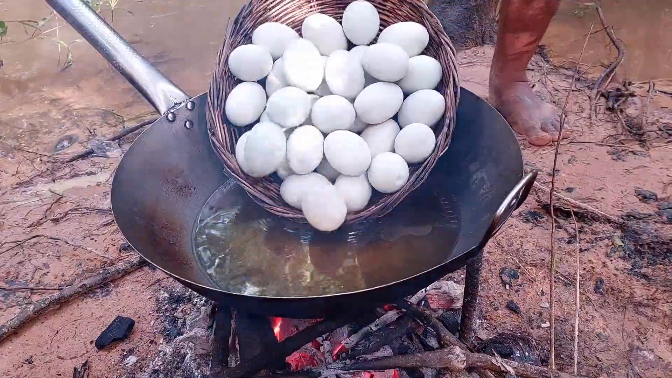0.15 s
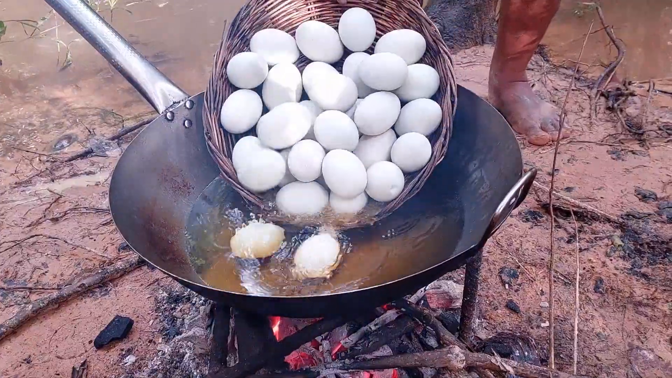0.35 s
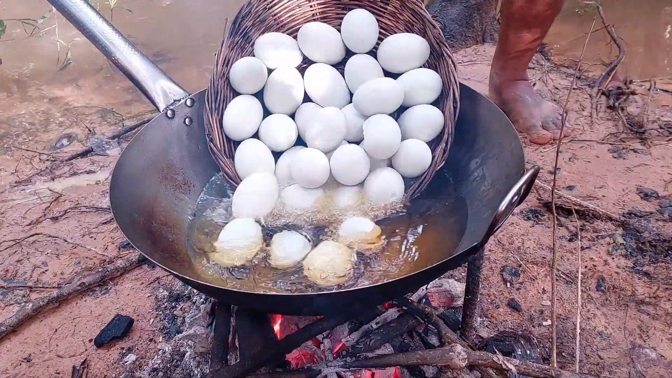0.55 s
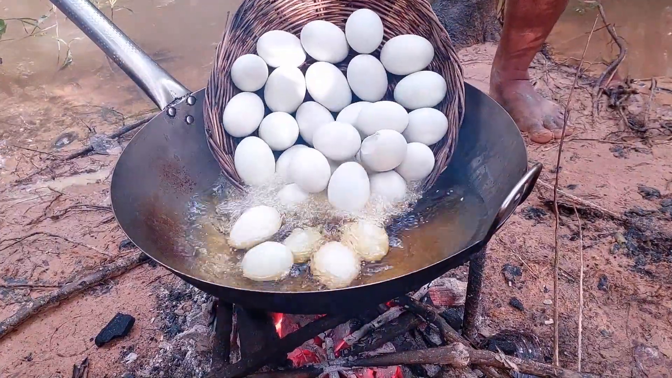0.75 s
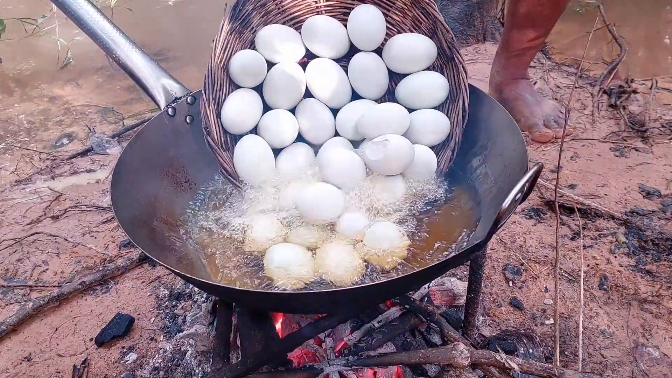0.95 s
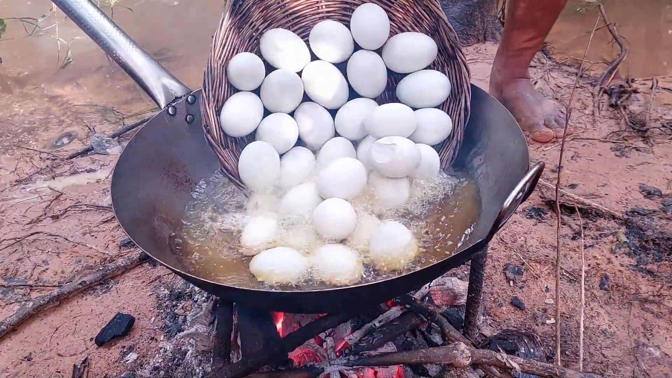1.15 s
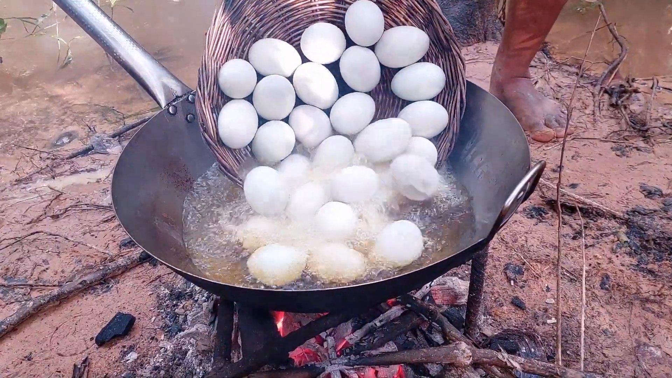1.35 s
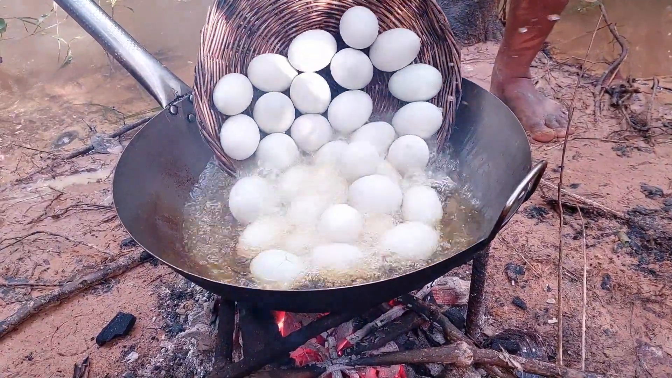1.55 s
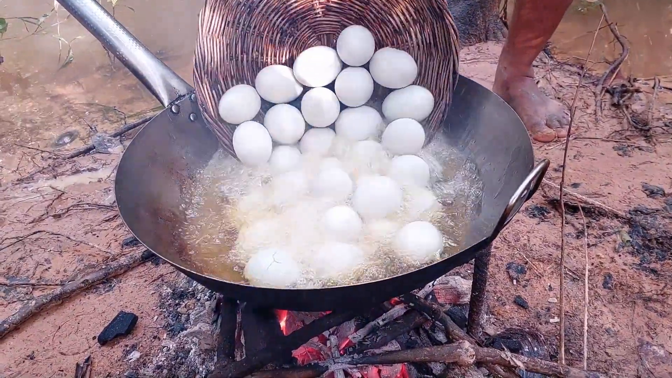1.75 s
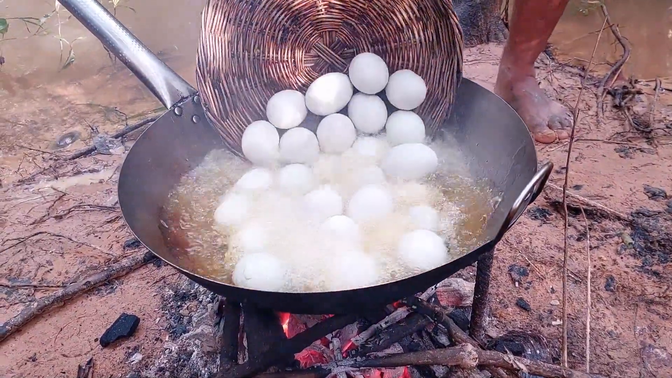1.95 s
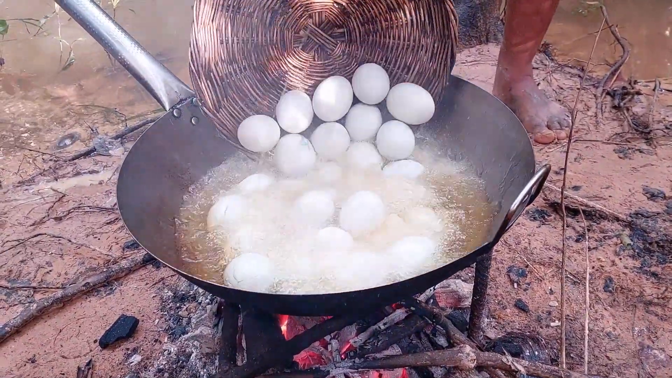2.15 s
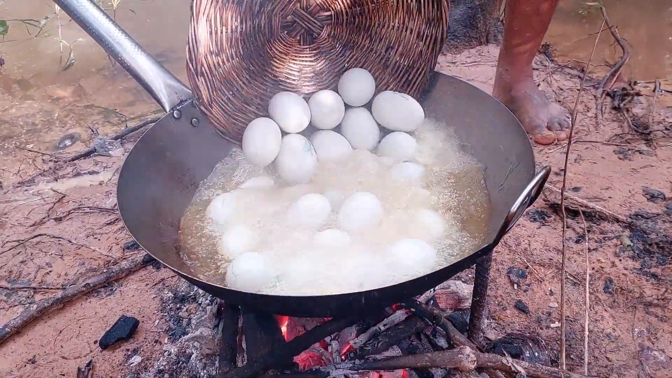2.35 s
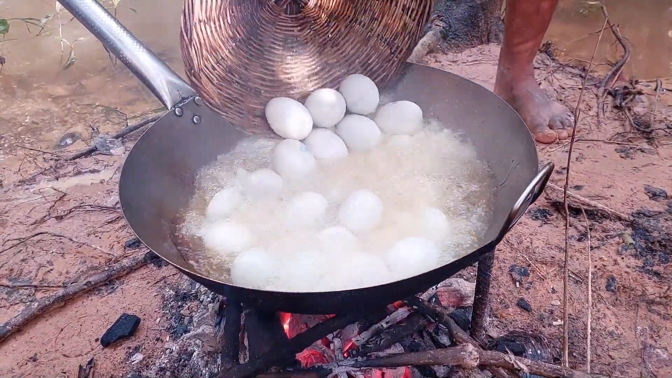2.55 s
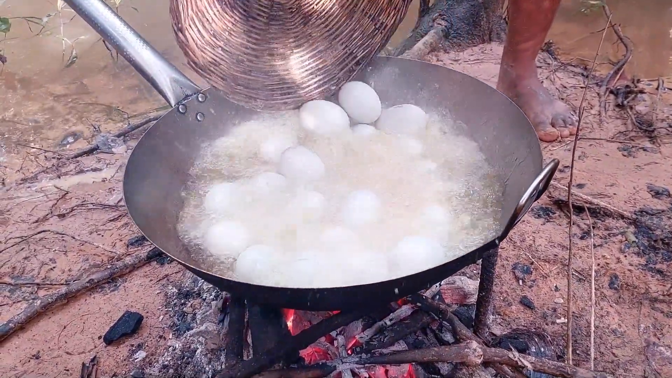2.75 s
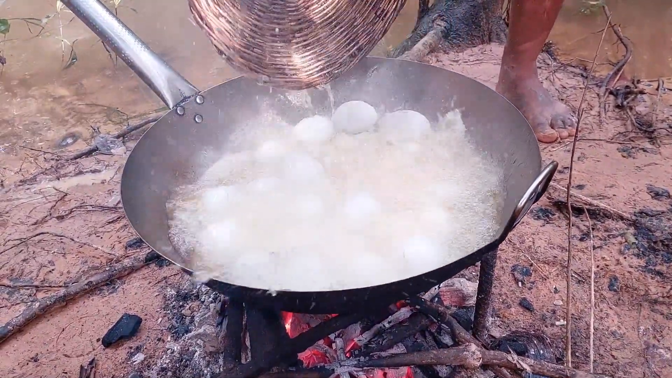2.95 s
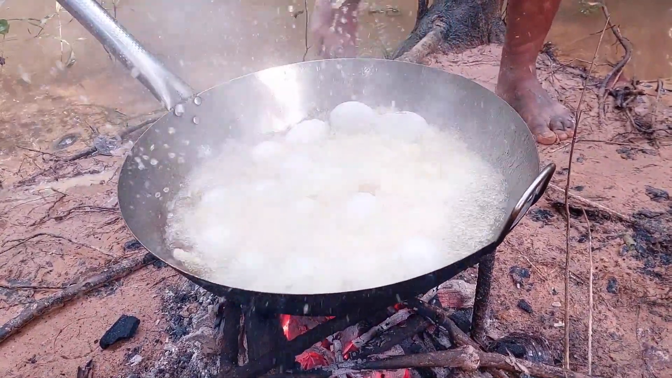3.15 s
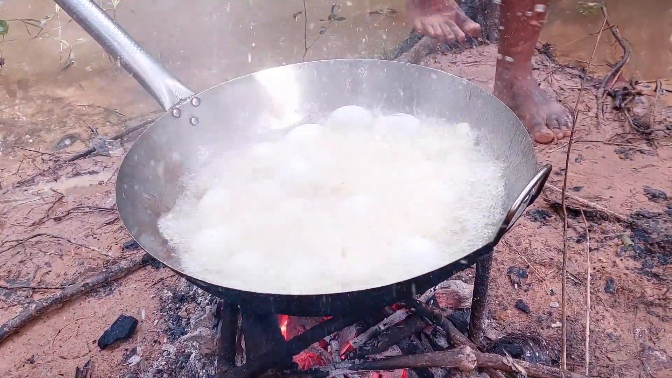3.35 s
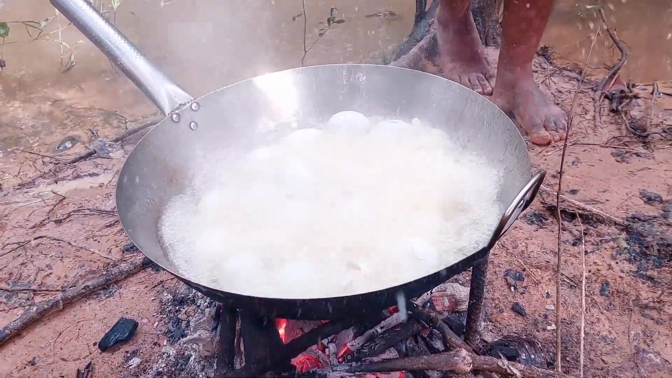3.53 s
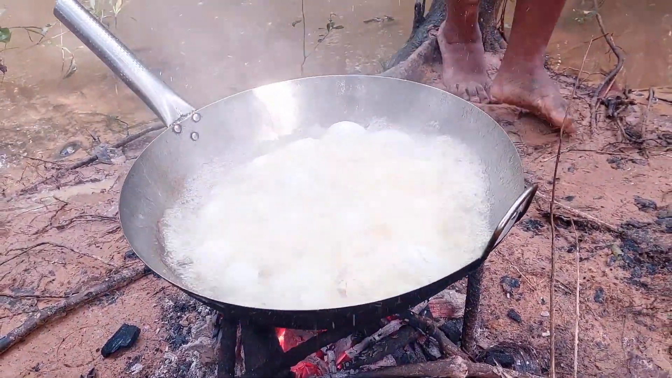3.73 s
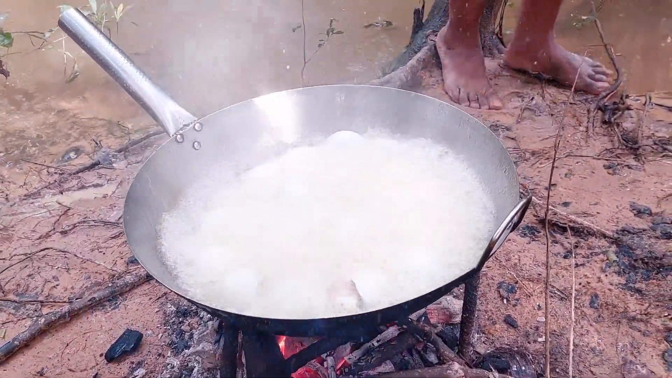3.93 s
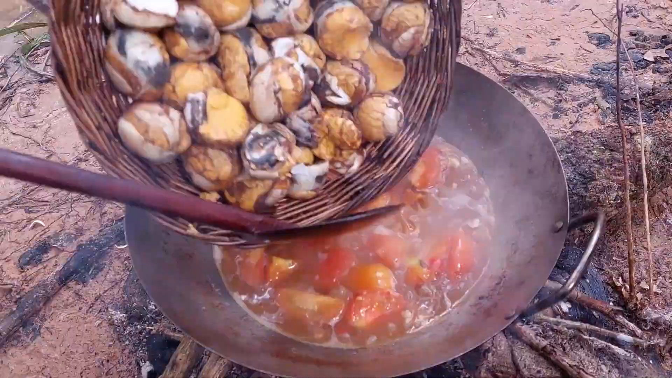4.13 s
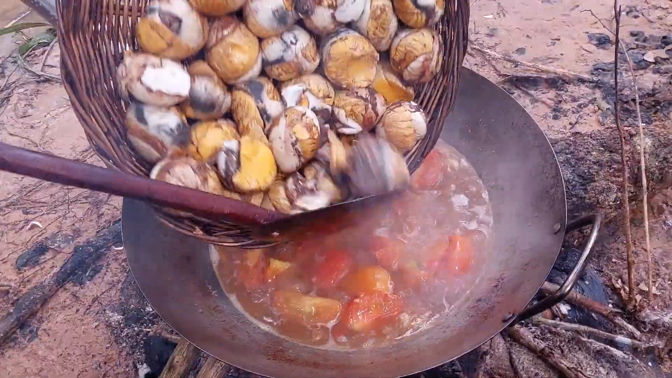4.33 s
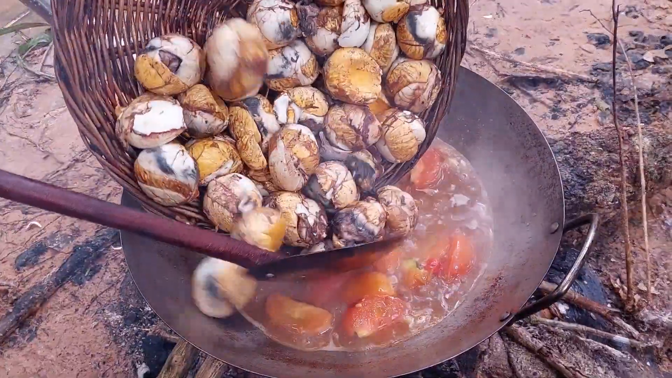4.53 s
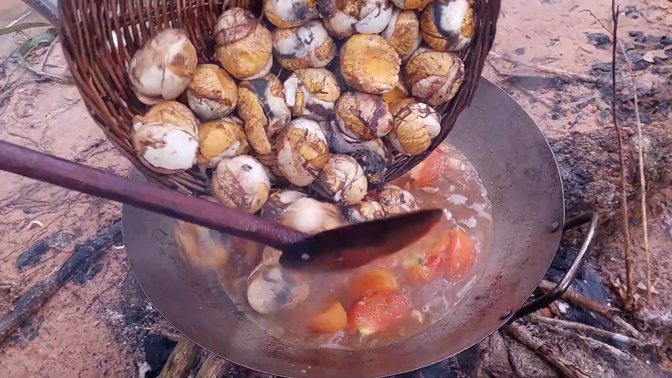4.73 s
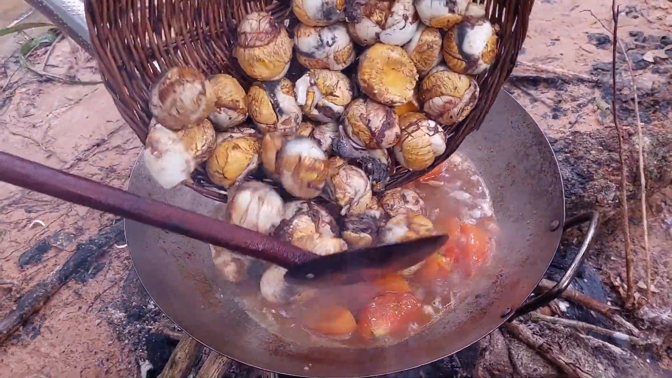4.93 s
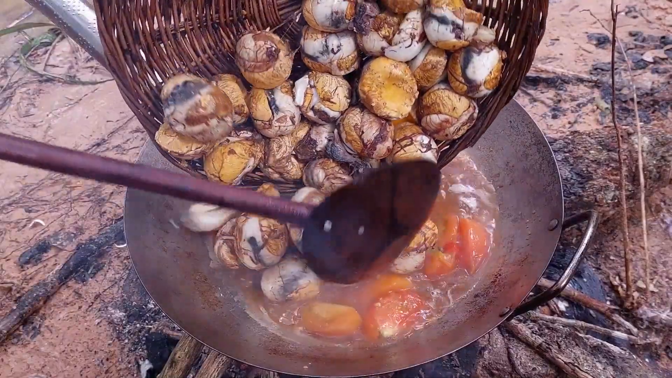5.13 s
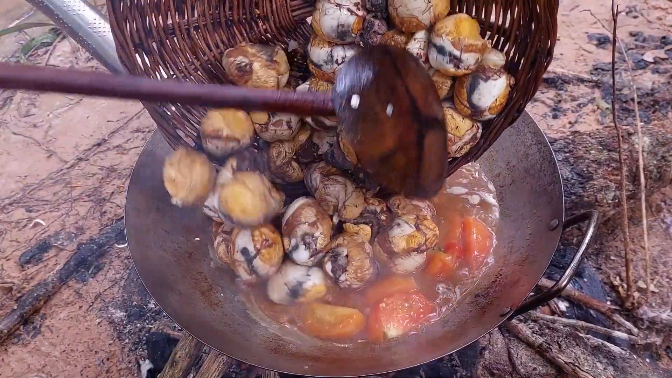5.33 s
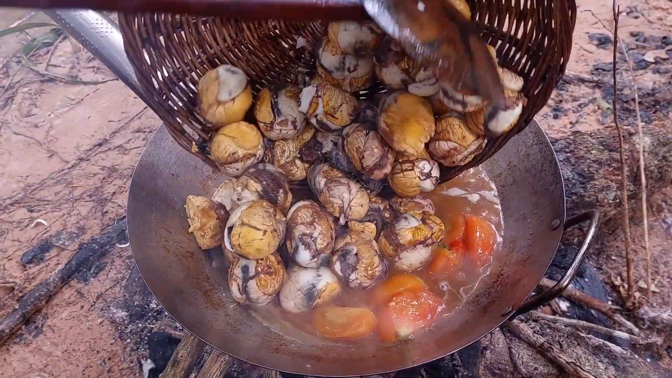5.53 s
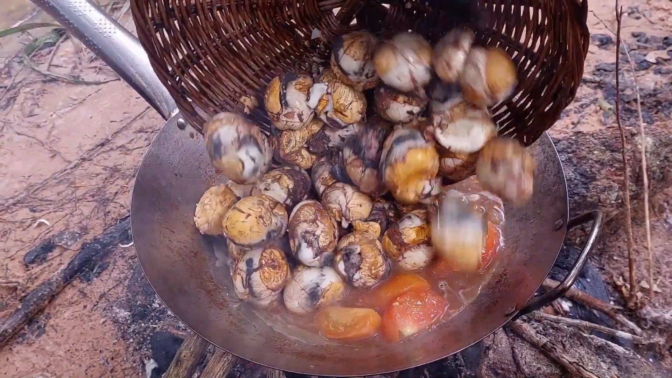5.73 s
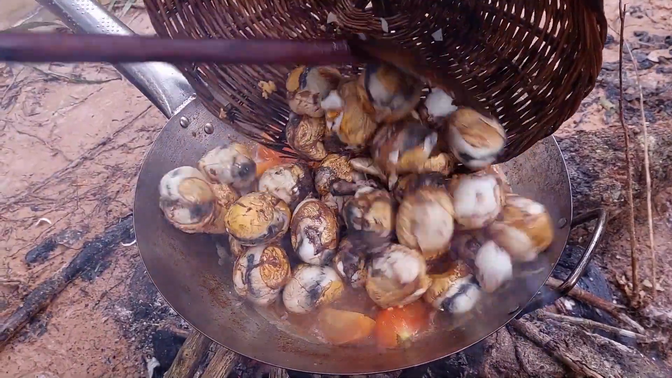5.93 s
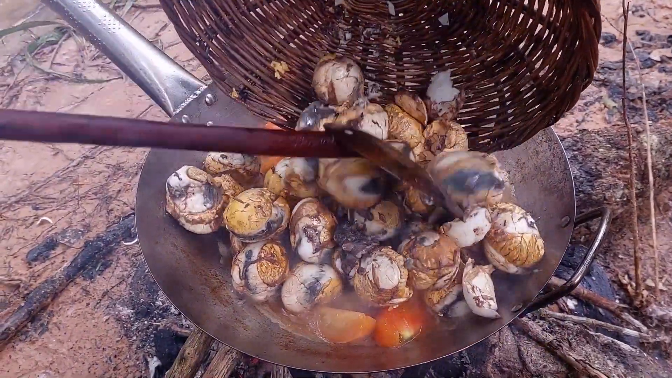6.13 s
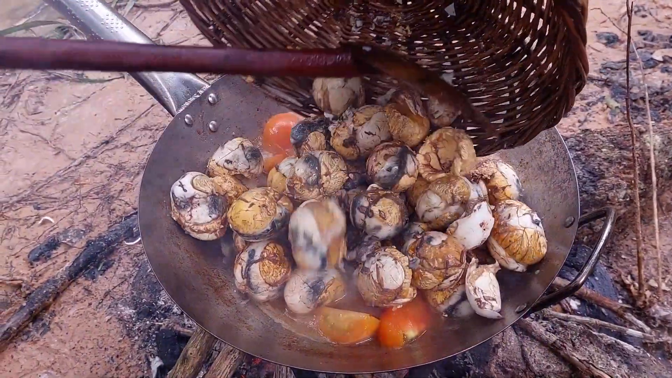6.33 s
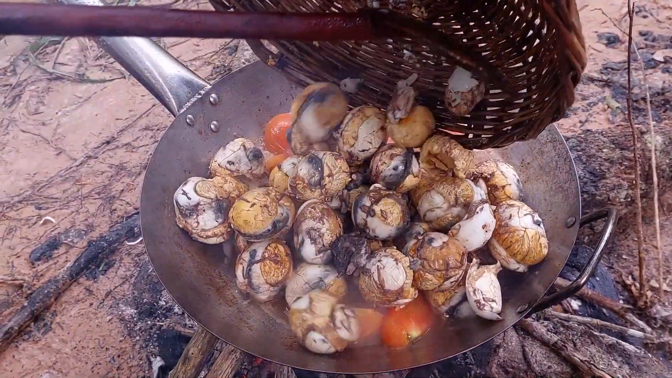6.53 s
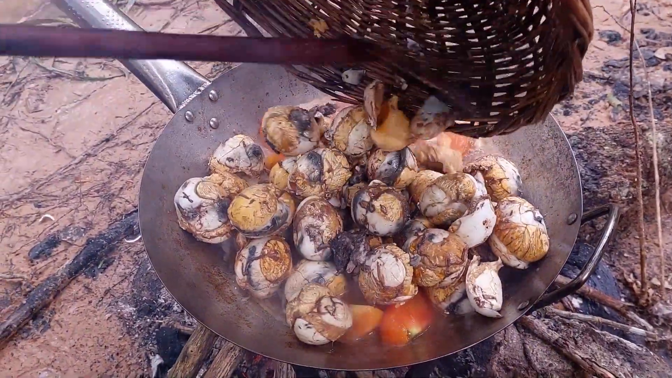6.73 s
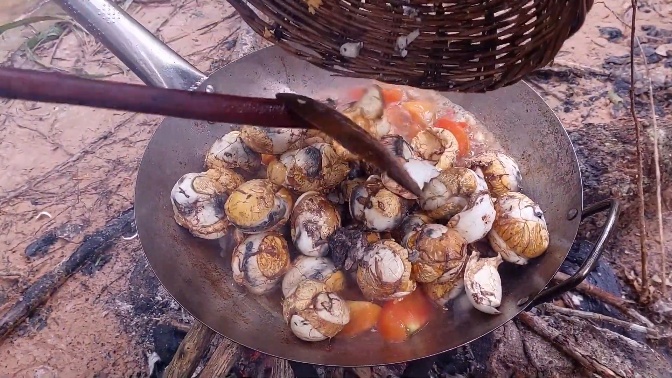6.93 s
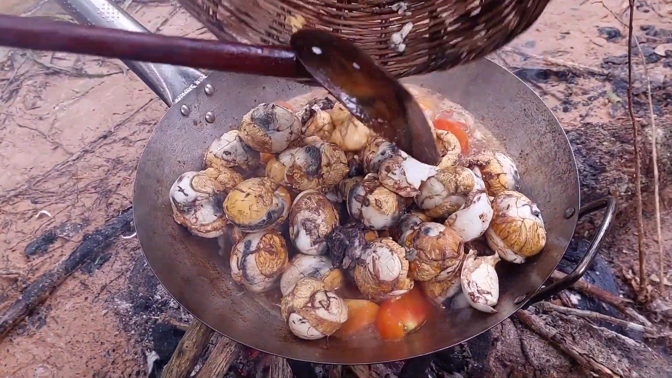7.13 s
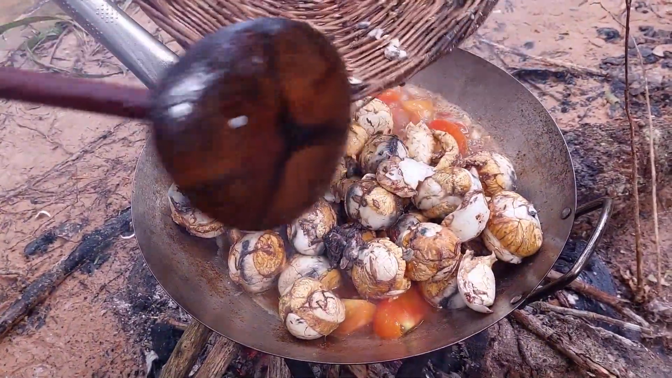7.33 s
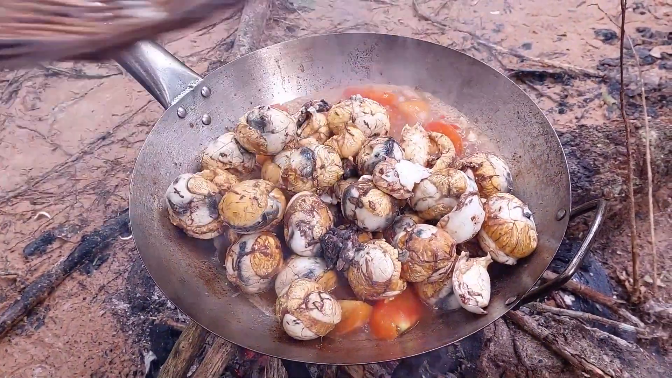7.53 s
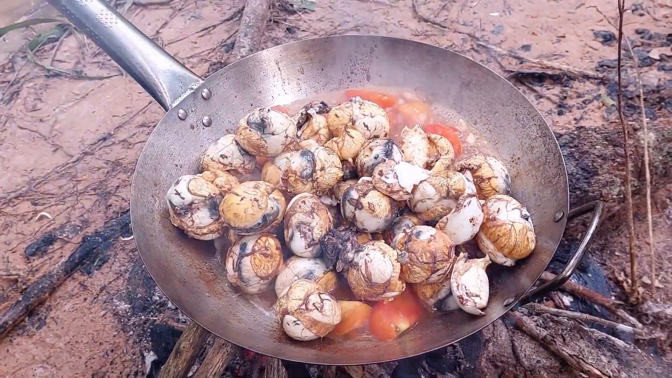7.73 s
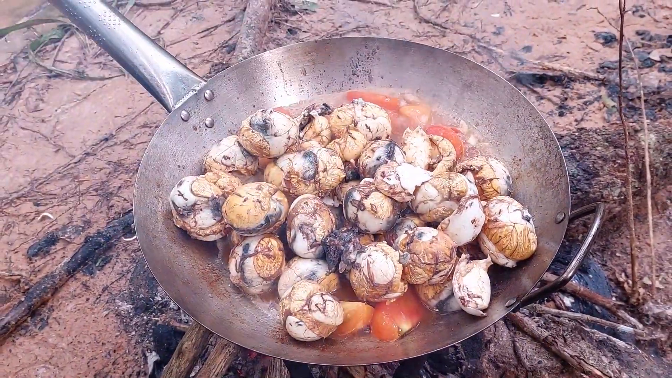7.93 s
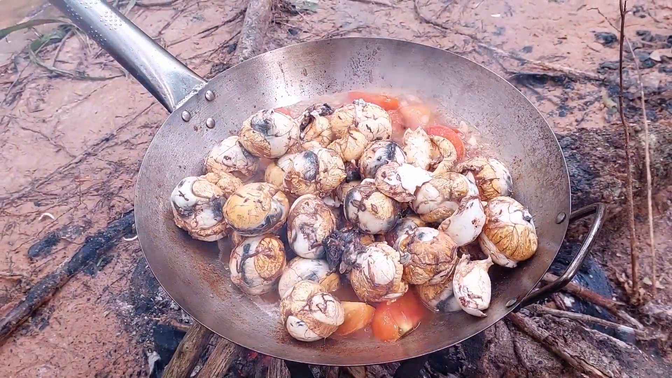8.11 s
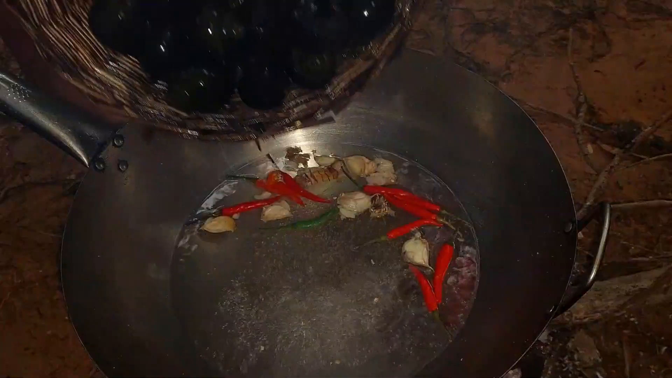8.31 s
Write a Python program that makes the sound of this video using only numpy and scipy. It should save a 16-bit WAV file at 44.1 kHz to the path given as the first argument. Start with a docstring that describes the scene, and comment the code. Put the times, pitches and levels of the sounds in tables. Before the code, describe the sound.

Eggs plop into a wok of hot oil that crackles and foams loudly, then fried eggs tumble into quieter, hissing sauce as a ladle knocks.

```python
"""Eggs frying in a wok

Close to a steel wok over a wood fire, on a stereo pair. Peeled eggs slide from a basket into hot oil and
plop; their water boils out, so the oil crackles, spits and foams up. Then, abruptly, a quieter scene: the
fried eggs tumble into simmering sauce and hiss on the hot steel while a wooden ladle knocks them out of
the basket. The flames rumble underneath throughout."""
import sys
import numpy as np
from scipy import signal
from scipy.fft import rfft, irfft, next_fast_len
from scipy.io import wavfile
from scipy.ndimage import uniform_filter1d, map_coordinates

SR = 44100
rng = np.random.default_rng(int(sys.argv[2]) if len(sys.argv) > 2 else 0)


def generate_wav(signal):
    """Clip the signal to [-1, 1] and save it as 16-bit WAV at the path in sys.argv[1]."""
    frames = np.transpose(np.atleast_2d(signal))
    scaled = np.clip(frames, -1, 1) * 32767
    pcm = np.round(scaled).astype(np.int16)
    wavfile.write(sys.argv[1], SR, pcm)


N = 373527
T = np.arange(N) / SR
OIL_START_S, OIL_END_S, SAUCE_END_S = 0.068, 4.175, 8.33
FOAM_HALF_RISEN_S, GURGLE_DELAY_S = 2.31, 0.22


# The frying dips briefly, mostly after loud pops: centre_s, half_length_s, depth_db
LEVEL_DUCKS = [(0.507, 0.04, 2.5), (1.337, 0.024, 7), (1.595, 0.018, 3), (2.995, 0.017, 5),
               (3.26, 0.051, 4), (3.383, 0.068, 4), (3.999, 0.019, 2.5)]
# The hollow of the wok, heard from above: centre_hz, width_hz, gain_db
WOK_HOLLOW = [(218, 21, 2.5), (532, 60, 4), (875, 200, 2), (1070, 116, -4), (1320, 150, 5), (2190, 71, 4.5),
              (4680, 330, 1.5)]
# The oil's balance across the pair: frequency_hz, left_minus_right_db
OIL_BALANCE = [(60, -13), (110, -3), (200, -5.5), (380, 0), (700, -3.5), (1290, 0.5), (2380, -0.5),
               (4400, -5), (8120, 5), (15000, -10.5)]
def deep_frying(grow_s=0.16, left_lead_ms=0.059):
    """Water boils out of the eggs: bubbles of all sizes heave together in the hollow of the wok."""
    heave = wobble(45) * (1 + 0.41 * foam_height(GURGLE_DELAY_S))
    body = gurgle(heave) + boil(heave) + crackle(heave)
    spray = fizz(heave)
    body += singing_steel() + roil()
    grown = 1 - np.exp(-np.maximum(T - OIL_START_S, 0) / grow_s)  # only the fizz starts at once
    foam = (body * grown + spray) * amp(-sum(db * swell(s, half) for s, half, db in LEVEL_DUCKS))
    hollow = filtered(foam, lambda hz: amp(sum(db / (1 + (2 * (hz - centre) / width) ** 2)
                                               for centre, width, db in WOK_HOLLOW)))
    slosh = np.clip(1 + 0.24 * wobble(14), 0, 2)  # the hollow ring comes and goes
    foam += (hollow - foam) * slosh
    sides = np.array([[.5], [-.5]])
    placed = filtered(foam, lambda hz: amp(sides * along(OIL_BALANCE, hz))
                      * np.exp(2j * np.pi * sides * hz * left_lead_ms / 1000))
    return placed * (until(OIL_END_S) - until(OIL_START_S))


# How hard the oil boils: time_s, strength_db
BOIL_STRENGTH = [(0.23, -38), (0.27, -38.5), (0.58, -33.5), (0.75, -33), (1.04, -30), (1.27, -25),
                 (1.54, -24.5), (1.83, -23.5), (2.45, -23), (2.72, -23.5), (3.07, -26.5), (3.18, -26),
                 (3.4, -27.5), (3.68, -27.5), (3.96, -27.5)]
FULL_BOIL_DB = -24.5
def frying_gain(db, follow, foam_db, delay_s=0):
    """A layer gains follow dB per dB of boil strength, and foam_db more under full foam."""
    strength_db = curve(BOIL_STRENGTH) - FULL_BOIL_DB
    return amp(db + follow * strength_db + foam_db * foam_height(delay_s))


def foam_height(delay_s, rise_s=0.18):
    """The foam climbs from nothing (0) until it covers the eggs (1)."""
    return .5 + .5 * np.tanh((T - delay_s - FOAM_HALF_RISEN_S) / (2 * rise_s))


# Spectrum of the crackling surface: frequency_hz, level_db
CRACKLE_SPECTRUM = [(300, -42), (900, -2), (1200, -8.5), (1650, 1), (2400, 3), (4000, 2.5), (4700, -3.5),
                    (5300, -5), (6500, -16), (9000, -19), (16000, -23)]
def crackle(heave):
    """Small bubbles burst by the thousand on the oil."""
    popping = coloured(bursts(per_s=3200, spread_db=1.5, lag_ms=.1), CRACKLE_SPECTRUM)
    popping = dappled(popping, depth_db=2.22) * amp(0.35 * heave + 0.75 * wobble(160))
    return popping * frying_gain(-21.5, follow=0.87, foam_db=-1.2)


# Spectra of small and of large bubbles: frequency_hz, level_db
SMALL_BOIL_SPECTRUM = [(200, -45), (480, -13.5), (750, -4), (950, 3.5), (1150, 4), (1500, 8), (2200, 0),
                       (3500, -24), (8000, -53)]
LARGE_BOIL_SPECTRUM = [(150, -37), (320, -8), (420, 4.5), (650, -1), (900, 1), (1150, -16), (1500, -13),
                       (2200, -1), (3500, -29), (8000, -53)]
# Their blend: time_s, large_share (0 to 1)
LARGE_SHARE = [(0, 1), (.5, 1), (.75, 0.1), (1.05, 0.7), (1.65, 0), (2.5, 0.2), (4.17, 0.57)]
def boil(heave):
    """Steam bubbles ring and pop, deeper when more of them are large."""
    large = curve(LARGE_SHARE)
    popping = bubbles(per_s=480, hz=951, scatter=1.0, cycles=16.3, spread_db=1.5, lag_ms=0.089)
    popping += 2.43 * bursts(per_s=3500, spread_db=2.5, lag_ms=0.07)
    blend = np.sqrt(1 - large) * coloured(popping, SMALL_BOIL_SPECTRUM)
    blend += np.sqrt(large) * coloured(popping, LARGE_BOIL_SPECTRUM)
    return dappled(blend * amp(heave), depth_db=1.5, frames=12) * frying_gain(-31, follow=0.91, foam_db=6.8)


# Spectrum of the finest bubbles, close up: frequency_hz, level_db
FIZZ_SPECTRUM = [(2500, -26), (6000, -3), (8000, -7), (10000, -5.5), (11500, 0), (12700, 2), (14000, -0.5),
                 (15800, -7)]
def fizz(heave):
    """The finest bubbles hiss; now and then a droplet near the microphones snaps out."""
    snaps = .37 * bursts(per_s=80, spread_db=2.2, lag_ms=.12)
    hiss = coloured(bursts(per_s=11000, spread_db=3.5, lag_ms=.12) + snaps, FIZZ_SPECTRUM)
    return hiss * amp(0.52 * heave + 1.1 * wobble(90)) * frying_gain(-27, follow=0.59, foam_db=1.3)


# Spectrum of the deep boil: frequency_hz, level_db
GURGLE_SPECTRUM = [(25, -46), (70, -17), (130, 2.5), (240, 6), (330, 1.5), (500, 0), (1200, -62)]
def gurgle(heave):
    """A low bubbling comes up shortly after the foam rises."""
    bubbling = coloured(bursts(per_s=300, spread_db=2.0, lag_ms=0.35), GURGLE_SPECTRUM) * amp(2 * heave)
    return bubbling * frying_gain(-48, follow=0.077, foam_db=13.7, delay_s=GURGLE_DELAY_S)


# Spectrum of the ringing steel: frequency_hz, level_db
STEEL_SPECTRUM = [(1500, -36), (2000, -33), (2200, -15), (2450, -21), (3400, -4), (4000, -16), (4300, 4),
                  (4520, 12), (4780, -0.5), (5150, -13), (6200, -42)]
# The steel sings up under an egg: centre_s, half_length_s, gain_db
STEEL_SWELLS = [(0.81, 0.018, 12), (0.875, 0.0093, 4), (.94, 0.014, 3.5), (1.068, .012, 8),
                (1.153, 0.022, 4), (1.403, .012, 4)]
def singing_steel(start_s=0.48):
    """The steel sings once eggs lie on it, until the foam muffles it."""
    ring = coloured(bursts(per_s=1000, spread_db=-2.0, lag_ms=0.13), STEEL_SPECTRUM)
    ring = dappled(ring, depth_db=3.5, bins=5, frames=5)
    ring *= amp(2.4 * wobble(25.2) + sum(db * swell(s, half) for s, half, db in STEEL_SWELLS))
    return ring * frying_gain(-34, follow=0.25, foam_db=-21) * (1 - until(start_s))


# Spectrum of a surge: frequency_hz, level_db
SURGE_SPECTRUM = [(300, -23), (500, -4), (680, -13), (880, -3), (1080, -7), (1280, -3.5), (1780, -3),
                  (2250, 5), (2800, -3), (4500, -22), (9000, -50)]
# Surges of the oil: centre_s, half_length_s, level_db
OIL_SURGES = [(1.246, 0.047, -41), (1.717, 0.086, -28), (2.41, 0.06, -24.5), (2.51, 0.041, -23.5),
              (2.654, 0.091, -31.5), (2.81, 0.043, -22.5), (3.43, 0.15, -29.5), (3.827, 0.072, -31),
              (4.046, 0.031, -26)]
def roil():
    """The oil boils up round each fresh batch of eggs."""
    ringing = bubbles(per_s=1300, hz=1355, scatter=1.086, cycles=11.3, spread_db=2, lag_ms=0.11)
    return coloured(ringing, SURGE_SPECTRUM) * sum(amp(db) * swell(s, half) for s, half, db in OIL_SURGES)


# Spectrum of a wet contact: frequency_hz, level_db
WET_SPECTRUM = [(200, -8.5), (700, -14), (1000, -13.5), (1300, -9.5), (2000, -6.5), (5000, -19.5),
                (16000, -47)]
# Eggs dropping in and big steam bubbles bursting: start_s, level_db, pitch_hz, life_cycles
OIL_PLOPS = [(.439, -19, 430, 7.8), (.468, -18, 517, 19), (.5415, -10, 436, 7.2), (.584, -16.5, 520, 7.4),
             (.608, -23, 397, 5.9), (.718, -20, 337, 4.3), (1.031, -16, 393, 6.7), (1.4835, -2.5, 510, 5.5),
             (1.487, -10, 235, 2.3), (1.606, -9.5, 990, 28), (1.675, -16, 950, 36), (1.726, -12, 360, 2.9),
             (1.748, -10, 1330, 59), (2.527, -11, 990, 11), (2.559, -15, 147, 6.9), (2.593, -9, 910, 15),
             (2.737, -20, 775, 14), (2.9485, -7.5, 260, 4.3), (2.951, -9, 533, 8.3), (2.968, -4, 500, 9.5),
             (2.978, -20, 624, 6.2), (3.022, -11, 900, 14), (3.033, -7, 445, 9.6), (3.17, -8, 496, 13),
             (3.2245, -4, 456, 5.6), (3.2358, -5.5, 523, 5.4), (3.357, -9.5, 816, 12),
             (3.364, -11, 1100, 9), (3.389, -13, 80, 2.3), (3.401, -12, 705, 8), (3.4355, -6, 430, 8.3),
             (3.444, -10, 170, 2.6), (3.548, -13, 500, 19), (3.616, -8.5, 770, 16), (3.621, -10.5, 410, 12),
             (3.709, -12, 730, 14), (3.742, -16.5, 80, 3), (3.772, -17, 443, 34), (3.849, -9, 554, 15),
             (3.948, -8.5, 760, 16), (3.96, -13.5, 920, 67), (4.03, -16, 505, 16), (4.114, -11, 460, 11)]
def plops(glide=0.16, splash=0.61, splash_attack_s=0.00054, offshoot_db=-11, offshoot_s=0.009):
    """A cavity in the oil rings and rises under a wet splash, then sheds a smaller bubble."""
    out, t = blank(SR // 8)
    lesser = []  # once the foam is up, these follow the strength of the boil
    for s, db, deviation in scattered(FOAM_HALF_RISEN_S + GURGLE_DELAY_S, OIL_END_S, per_s=6, db=-16.5):
        strength_db = np.interp(s, *np.transpose(BOIL_STRENGTH)) - FULL_BOIL_DB
        lesser.append((s, db + strength_db, 510 * np.exp(0.43 * deviation), 10))
    for s, db, hz, cycles in list(OIL_PLOPS) + lesser:
        rise, late, smaller = rng.random(3)
        wet = coloured(noise(len(t), 1.0), WET_SPECTRUM) * decay(t, cycles / hz) * onset(t, splash_attack_s)
        plop = gulp(t, hz, cycles, glide * rise) + splash * wet
        low_cut = signal.butter(2, 0.28 * hz, "high", fs=SR)
        add(out, s, signal.lfilter(*low_cut, plop), db)
        add(out, s + offshoot_s * (.5 + late), gulp(t, hz * (1 + smaller), 2 * cycles, glide), db + offshoot_db)
    return out


# Spectra of a droplet's bright snap and its lower pop: frequency_hz, level_db
SNAP_SPECTRUM = [(3000, -19), (9000, -8), (13000, 5), (16000, -6), (16500, -40)]
POP_SPECTRUM = [(500, -8), (2200, 3), (4000, 6), (7000, -5), (16000, -23)]
# Single droplets snapping, faint to loud: start_s, level_db, pop_over_snap_db
OIL_SPITS = [(.0263, -33.5, 10), (.0593, -27, -5), (.3706, -10, -10), (.8842, -11, 2), (.903, -21, 5),
             (1.0985, -4, -1), (1.2215, -8, 6), (1.5585, -8, -6), (1.5781, -6, -7), (1.6483, -4, -4),
             (1.7747, -3, -1), (1.863, -11, -4), (2.237, -14, -4), (2.2693, -10, -5), (2.469, -12, -4),
             (2.549, -1, 9), (2.5733, -8, -2), (2.671, -8, -3), (2.8353, 0, -7), (2.9035, -5, -4),
             (2.9864, -6, -13), (3.0348, -9, -9), (3.11, -5, -4), (3.2055, -3, -3), (3.3015, -7, -11),
             (3.3156, -8, -15), (3.3207, -2, -12), (3.3325, -10, -12), (3.3697, -5, -7), (3.3888, -7, -6),
             (3.6409, -10, -5), (3.6518, -4, -8), (3.6983, -11, -7), (3.7163, -6, -17), (3.7411, -16, -11),
             (3.7917, -11, -6), (3.8701, -8, 7), (3.8835, -5, 6), (3.91, -13, -4), (4.056, -15, 4),
             (4.1453, -5, 2)]
# Spray on the hot rim and the embers: centre_s, half_length_s, level_db
RIM_SPRAYS = [(.747, 0.062, -25.5), (2.847, 0.017, -25), (3.33, 0.016, -24.5)]
def spits(chance_start_s=1.0, pop_spread_db=7, t60_s=.004):
    """Droplets burst with a snap and a pop, and sprays of them spatter, right of centre."""
    out, t = blank(SR // 50)
    chance = scattered(chance_start_s, OIL_END_S, per_s=22, db=-12.5, limit=96)
    strays = [(s, db, pop_spread_db * deviation) for s, db, deviation in chance]
    for s, db, pop_db in list(OIL_SPITS) + strays:
        snap = coloured(noise(len(t), 0.55), SNAP_SPECTRUM)
        pop = coloured(noise(len(t), 0.57), POP_SPECTRUM)
        add(out, s, (snap + amp(pop_db) * pop) * decay(t, t60_s), db)
    spray_spectrum = [(2000, -7), (6000, 8.5), (9000, 5), (13000, 10), (16000, -2)]
    spray = coloured(bursts(per_s=3600, spread_db=-3, lag_ms=0.17), spray_spectrum)
    out += spray * sum(amp(db) * swell(s, half) for s, half, db in RIM_SPRAYS)
    return out * amp([[-3.5], [.5]])


# Spectrum of water flashing to steam: frequency_hz, level_db
FLASH_SPECTRUM = [(500, -24), (1500, -27), (2250, -19), (2700, -16), (3400, -7), (4000, -6), (4600, 6),
                  (5200, -14), (7000, -21), (16000, -45)]
# Modes of the wok struck by an egg: pitch_hz, level_db, t60_s
WOK_MODES = [(1490, -18, 0.01), (2260, 3, 0.022), (2610, -4, .016), (3330, -4, 0.022)]
# Eggs hitting the steel: start_s, steam_db, clack_over_steam_db
EGG_HITS = [(0.36, -20.5, -1), (0.418, -5, -16), (0.426, -17, -20), (0.553, -4, -9), (0.653, -19.5, -3),
            (1.021, -13.5, -8)]
def cracks(rise_s=0.0027, tail_db=-12, tail_t60_s=0.18, rough=0.59):
    """An egg clacks on the wok; a burst of steam swells and leaves the steel ringing."""
    out, t = blank(SR // 5)
    for s, db, clack_db in EGG_HITS:
        flash = coloured(noise(len(t), 0.52), FLASH_SPECTRUM) * t / rise_s * np.exp(1 - t / rise_s)
        ring = coloured(noise(len(t), 0.43), STEEL_SPECTRUM) * amp(tail_db) * decay(t, tail_t60_s)
        clack = sum((np.sin(2 * np.pi * hz * t) + rough * band(len(t), hz)) * amp(level) * decay(t, t60)
                    for hz, level, t60 in WOK_MODES)
        add(out, s, flash + ring * onset(t, rise_s), db)
        add(out, s, clack * onset(t, rise_s), db + clack_db)
    return out * amp([[-1.5], [1.5]])


# Wet eggs splattering deep in the foam: start_s, level_db, centre_hz, t60_s
FOAM_SPLATS = [(.294, -26, 795, 0.081), (.652, -14.5, 3000, 0.067), (.876, -19, 2400, .025),
               (.93, -21, 3000, .025), (1.057, -18, 2820, .03), (1.172, -19, 2400, 0.038),
               (1.2097, -14, 2280, 0.023), (1.482, -9, 1200, 0.024), (2.504, -10, 1900, 0.05),
               (2.933, -10, 3200, .05), (3.192, -10.5, 4260, 0.017), (3.21, -10.5, 2800, 0.026),
               (3.429, -16, 3200, 0.021), (3.617, -13, 1500, 0.057), (3.975, -13.5, 1000, 0.06)]
def splats(attack_s=0.0016):
    """Trapped water lets go in a short, coarse rush of bubbles."""
    out, t = blank(SR // 10)
    for s, db, hz, t60 in FOAM_SPLATS:
        add(out, s, band(len(t), hz) * decay(t, t60) * onset(t, attack_s), db)
    return out


def ping(start_s=.149, level_db=-32.5, pitch_hz=887, t60_s=0.13):
    """The first egg touches the steel and leaves one short note."""
    out, t = blank(SR // 4)
    add(out, start_s, np.sin(2 * np.pi * pitch_hz * t) * decay(t, t60_s), level_db)
    return out


# Spectrum of an egg's first hiss: frequency_hz, level_db
SEAR_SPECTRUM = [(1500, -30), (2800, -2), (3400, -6), (4000, 10), (4400, -2.5), (5000, -6), (5600, 3),
                 (6700, -15), (7600, 1), (9000, -8), (11800, 7), (16000, -8)]
# Wet eggs pressed on bare steel: start_s, steam_db, rise_s, steam_fade_db_per_s, hiss_db, echo_ms
EGG_SEARS = [(4.80, -53, 0.037, 5, -66, .86), (5.245, -36.5, 0.056, 20, -50, .83),
             (5.902, -34.5, 0.012, 3, -24.5, .9), (6.02, -50, 0.042, 2, -30, .79),
             (6.09, -50, .012, 60, -36, .83), (6.215, -47, .02, 58, -32, .8),
             (6.32, -45, .015, 60, -34.5, .88), (6.79, -52, 0.02, 43, -34.5, 0.79),
             (7.175, -32.5, .035, 130.5, -60, .86), (7.83, -39.5, 0.034, 131, -70, .86)]
def sears(echo=0.35, t60_s=0.77, sputter_db=2.4):
    """A wet egg sputters on one spot; the echo off the pan wall gives each hiss its own hollow colour."""
    out, t = blank(SR)
    for s, _, rise_s, _, db, echo_ms in EGG_SEARS:
        hiss = coloured(noise(len(t), 0.92), SEAR_SPECTRUM)
        hiss = unit(filtered(hiss, lambda hz: 1 + echo * np.exp(-2j * np.pi * hz * echo_ms / 1000)))
        part = out[:, round(s * SR):][:, :len(t)]
        part += (hiss * amp(db) * decay(t, t60_s) * onset(t, rise_s))[:, :part.shape[1]]
    return out * amp(sputter_db * wobble(70))


def steam_db(sauce_alone_db=-60):
    """Every wet egg on the steel adds steam that rises quickly and fades as the spot dries."""
    power = amp(sauce_alone_db) ** 2
    for s, db, rise_s, fade_db_per_s, *_ in EGG_SEARS:
        age = np.maximum(T - s, 0)
        power += (amp(db - fade_db_per_s * age) * onset(age, rise_s)) ** 2
    return 10 * np.log10(power)


# Spectra of the sauce's bubbles, its sizzle and its steam: frequency_hz, level_db
SIMMER_SPECTRUM = [(130, -34), (220, 5.5), (330, -17), (450, -12.5), (620, -3.5), (800, -3), (1000, -11.5),
                   (1300, -4), (1900, -5), (5000, -18)]
SIZZLE_SPECTRUM = [(450, -22), (700, -11.5), (1000, -8), (1300, 0), (1750, -4.5), (2100, -1.5), (2400, -5),
                   (2650, -3), (2950, -4), (3400, -0.5), (4500, -0.5), (7000, -4.5), (10000, -7),
                   (16000, -24)]
STEAM_SPECTRUM = [(4000, -20), (7500, -18), (10000, -8), (12000, -1), (13500, 0), (15800, -2)]
def simmering_sauce(covered_at_s=6.14, smother_db_per_s=3.5, dry_db_per_s=0.8, fade_at_s=8.2):
    """The sauce simmers and sizzles up the hot steel; both thin out once the eggs cover it."""
    steaming_db = steam_db()
    extra_steam_db = steaming_db + 40.5
    covered_s = np.maximum(T - covered_at_s, 0)
    simmer_gain = amp(-48 + 0.099 * extra_steam_db - smother_db_per_s * covered_s + 1.5 * wobble(35))
    sizzle_gain = amp(-43 + 0.79 * extra_steam_db - dry_db_per_s * covered_s)
    steam_gain = amp(steaming_db + 0.25 * wobble(13))
    ringing = bubbles(per_s=520, hz=760, scatter=0.84, cycles=15, spread_db=2, lag_ms=0.15)
    simmer = coloured(ringing + bursts(per_s=2000, spread_db=4.5, lag_ms=0.13), SIMMER_SPECTRUM)
    sizzle = coloured(bursts(per_s=6000, spread_db=0.8, lag_ms=.1), SIZZLE_SPECTRUM)
    sizzle = dappled(sizzle, depth_db=1.3) * amp(3.5 + 0.92 * wobble(30))
    steam = coloured(bursts(per_s=17000, spread_db=0.5, lag_ms=.1), STEAM_SPECTRUM)
    steam = dappled(steam, depth_db=1.3) * amp(6.7 + 0.75 * wobble(40))
    fade = amp(-17 * np.maximum(T - fade_at_s, 0))
    hiss = (sizzle_gain * sizzle + steam_gain * steam) * fade * until(SAUCE_END_S)
    faint_hiss = (amp(-58) * sizzle + amp(-56) * steam) * (1 - until(SAUCE_END_S))
    return (simmer_gain * simmer + hiss + faint_hiss) * (1 - until(OIL_END_S)) * amp([[-.6], [.6]])


# Modes of the wooden ladle: pitch_ratio, level_db, t60_share
LADLE_MODES = [(.8, -3, 0.59), (1, -4, 1), (1.88, -34, .8), (2.85, -17.5, 0.51)]
# Ladle against basket and wok: start_s, level_db, pitch_hz, t60_s
LADLE_KNOCKS = [(4.633, -39, 347, 0.23), (5.169, -31, 376, 0.44), (6.53, -34.5, 338, .15),
                (6.574, -36, 432, .14), (6.766, -30.5, 363, 0.18), (6.863, -27, 369, 0.29),
                (6.906, -25.5, 332, 0.23), (6.965, -31.5, 343, .26), (7.289, -33, 360, 0.12),
                (8.427, -38.5, 430, 0.15)]
def knocks(rustle=0.46, attack_s=0.0021):
    """Dull, hollow blows of the ladle, blurred by the shifting load."""
    out, t = blank(SR // 3)
    load_spectrum = [(120, -28), (280, -5.5), (450, -5), (600, -15), (2000, -23), (6000, -67)]
    for s, db, hz, t60 in LADLE_KNOCKS:
        ring = sum(amp(level + rng.normal(0, 3.3)) * decay(t, t60 * share) * np.sin(2 * np.pi * hz * k * t)
                   for k, level, share in LADLE_MODES)
        load = coloured(noise(len(t), 1.0), load_spectrum) * decay(t, t60)
        add(out, s, (ring + rustle * load) * onset(t, attack_s), db)
    return out


# Spectrum of an egg landing in sauce: frequency_hz, level_db
THUD_SPECTRUM = [(200, -10), (500, -9), (720, -1), (1000, -5), (1250, -7), (2000, -15), (16000, -55)]
# Fried eggs landing: start_s, level_db, bubble_pitch_hz
EGG_LANDINGS = [(4.255, -33.5, 719), (4.446, -35, 649), (4.481, -34, 746), (4.728, -32, 611),
                (4.797, -37, 665), (4.866, -44, 783), (4.927, -31.5, 710), (5.097, -31, 654),
                (5.231, -34, 680), (5.256, -35, 720), (5.284, -31, 697), (5.789, -31, 650),
                (5.868, -30, 730), (5.932, -28, 1110), (6.919, -30, 790), (7.123, -35, 700)]
def landings(t60_s=0.041, squelch=1.5):
    """Soft, wet contacts in the pan: a thud and the ring of a trapped bubble."""
    out, t = blank(SR // 10)
    for s, db, hz in EGG_LANDINGS:
        thud = coloured(noise(len(t), 0.48), THUD_SPECTRUM) * decay(t, t60_s)
        add(out, s, thud + squelch * gulp(t, hz, cycles=22, glide=0.087), db)
    return out


# Modes of a click: pitch_ratio, level_db
CLICK_MODES = [(.61, -13), (1, -1), (1.36, -9)]
# Crisp skins and wicker: start_s, level_db, centre_hz, t60_s
SKIN_CLICKS = [(4.2243, -38, 7000, 0.016), (4.2545, -36, 3470, 0.024), (4.4245, -37, 1710, .025),
               (4.427, -39, 7960, .025), (4.4605, -32, 2730, 0.021), (4.461, -36, 1650, .03),
               (4.5525, -42, 2800, 0.018), (4.604, -41, 3400, .025), (4.689, -40, 1900, .025),
               (4.7155, -32, 7500, 0.009), (4.777, -41, 2780, .03), (4.9167, -30, 2700, 0.028),
               (4.995, -33, 2680, 0.045), (5.1023, -37, 2750, 0.042), (5.119, -36, 2700, 0.018),
               (5.231, -35, 2150, .02), (5.8765, -16.5, 3320, .005)]
def clicks(tumble_end_s=5.3, edge=0.27, grit=.85):
    """Skins and wicker tick as the load shifts, each at its own pitch, with fainter ticks between."""
    out, t = blank(SR // 10)
    lesser = [(s, db, 2700 * np.exp(.55 * deviation), 0.012)
              for s, db, deviation in scattered(OIL_END_S, tumble_end_s, per_s=16, db=-44)]
    for s, db, hz, t60 in list(SKIN_CLICKS) + lesser:
        ring = sum(amp(level + rng.normal(0, 4, (2, 1))) * np.sin(2 * np.pi * hz * k * t)
                   for k, level in CLICK_MODES)
        crunch = band(len(t), hz) + edge * (band(len(t), hz / 2) + band(len(t), hz * 2))
        add(out, s, (ring + grit * crunch) * decay(t, t60), db)
    return out


def scrape(centre_s=8.41, half_length_s=0.036, level_db=-44):
    """Something slides briefly over the wet steel in many tiny slips."""
    slips = coloured(bursts(per_s=1200, spread_db=6, lag_ms=0.12), WET_SPECTRUM)
    return slips * amp(level_db) * swell(centre_s, half_length_s)


# Spectrum of the wood fire: frequency_hz, level_db
FIRE_SPECTRUM = [(20, -28), (35, -22), (55, -0.5), (80, -1), (130, 0), (180, -13.5), (300, -17),
                 (1000, -40.5), (5000, -37.5), (16000, -41)]
# Its rise and fall: time_s, strength_db
FIRE_STRENGTH = [(0.1, -48.5), (2.19, -52), (2.83, -51), (3.02, -43), (3.87, -46), (4.17, -51.5),
                 (4.95, -50.5), (6.99, -44.5), (8.35, -49)]
def fire(flutter_db=1.6):
    """Flames flutter and rumble under the wok."""
    rumble = coloured(noise(N, 0.26), FIRE_SPECTRUM)
    return rumble * amp(curve(FIRE_STRENGTH) + 2.5 + flutter_db * wobble(8.3))


def bursts(per_s, spread_db, lag_ms):
    """Tiny bursts of uneven strength; each reaches the two microphones with its own lag."""
    when, size, sign, left, right = rng.random((int(per_s * N / SR), 5)).T
    push = np.sign(sign - .5) * amp(-spread_db * np.log(size + .01))
    lag = np.log(left / right) * lag_ms * SR / 1000
    starts = [(when * N + way * lag / 2).astype(int) for way in (1, -1)]
    return unit(np.array([np.bincount(s % N, push, N) for s in starts]))


def bubbles(per_s, hz, scatter, cycles, spread_db, lag_ms):
    """Larger bubbles: each rings for some cycles, rising in pitch as it surfaces."""
    when, size, left, right, up, down = rng.random((int(per_s * N / SR), 6)).T[:, :, None]
    pitch = hz * np.exp(scatter * (up - down))
    k = np.arange(640)
    age = k / SR * pitch / cycles
    envelope = amp(-60 * age - spread_db * np.log(size + .02))
    ring = np.sin(2 * np.pi * cycles * age * (1 + age / 10)) * envelope
    lag = np.log(left / right) * lag_ms * SR / 1000
    starts = [(when * N + way * lag / 2).astype(int) for way in (1, -1)]
    return unit(np.array([np.bincount(((s + k) % N).ravel(), ring.ravel(), N) for s in starts]))


def gulp(t, hz, cycles, glide):
    """One bubble ringing down while its pitch rises."""
    age = t * hz / cycles
    return np.sin(2 * np.pi * hz * t * (1 + glide * np.minimum(age, 1))) * amp(-60 * age)


def dappled(x, depth_db, bins=7, frames=28):
    """The colour drifts in narrow patches as the sound finds shifting ways out between the eggs."""
    spectra = signal.stft(x, nperseg=1024)[2]
    patches = rng.standard_normal(spectra.shape[1:])
    patches = uniform_filter1d(uniform_filter1d(patches, bins, axis=0), frames, axis=1)
    return unit(signal.istft(spectra * amp(depth_db * unit(patches)), nperseg=1024)[1][:, :N])


def scattered(start_s, end_s, per_s, db, spread_db=1.5, limit=64):
    """Chance events: rows of start_s, level_db, deviation (-1 to 1)."""
    gap, loud, other = rng.random((limit, 3)).T
    times = start_s + np.cumsum(.2 + 1.6 * gap) / per_s
    return np.transpose([times, db + spread_db * (2 * loud - 1), 2 * other - 1])[times < end_s]


def noise(n, width):
    """Stereo white noise; width is side over mid."""
    mid, side = rng.standard_normal((2, n))
    return np.array([mid + width * side, mid - width * side])


def band(n, hz):
    """Stereo noise gathered around one frequency."""
    return coloured(noise(n, .5), [(hz / 4, -25), (hz * .7, -4), (hz, 0), (hz * 1.3, -5), (hz * 3, -28)])


def coloured(x, spectrum):
    """x shaped by a spectrum, at rms 1."""
    return unit(filtered(x, lambda hz: amp(along(spectrum, hz))))


def filtered(x, response):
    """x through a frequency response."""
    n = x.shape[-1]
    padded = next_fast_len(n + 4096)
    return irfft(rfft(x, padded) * response(np.fft.rfftfreq(padded, 1 / SR)), padded)[..., :n]


def along(points, hz):
    """Join points on a log frequency axis."""
    frequencies, values = np.transpose(points)
    return np.interp(np.log(hz + 1), np.log(frequencies), values)


def curve(points):
    """Join points in time, one value per sample."""
    return np.interp(T, *np.transpose(points))


def wobble(per_s):
    """A random curve with per_s knots a second."""
    return map_coordinates(rng.standard_normal(int(N * per_s / SR) + 4), [T * per_s], order=1)


def swell(s, half):
    """A smooth hump of height 1 around time s."""
    return np.exp(-((T - s) / half) ** 2)


def until(s):
    """Open up to time s, shutting within 4 ms."""
    return np.clip((s - T) / .004 + .5, 0, 1)


def onset(t, rise_s):
    """Rise from 0 towards 1."""
    return 1 - np.exp(-t / rise_s)


def decay(t, t60_s):
    """Fall by 60 dB in t60_s."""
    return amp(-60 * t / t60_s)


def amp(db):
    """Decibels to gain."""
    return 10 ** (np.asarray(db) / 20)


def unit(x):
    """Scale to rms 1."""
    return x / np.sqrt(np.mean(x ** 2) + 1e-20)


def blank(n):
    """A silent stereo track and the time axis of an n-sample event."""
    return np.zeros((2, N)), np.arange(n) / SR


def add(out, s, sound, db):
    """Mix in a sound at time s with its peak at db."""
    part = out[:, max(round(s * SR), 0):][:, :sound.shape[-1]]
    part += (amp(db) * sound / np.abs(sound).max())[..., :part.shape[1]]


def scene():
    """At the wok: first the oil, then the sauce, over the same fire."""
    oil = deep_frying() + ping() + plops() + cracks() + splats() + spits()
    sauce = simmering_sauce() + sears() + landings() + clicks() + knocks() + scrape()
    return oil + sauce + fire()


def record(dry):
    """The recorder clips at full scale and cuts off steeply at 16 kHz."""
    return filtered(np.clip(dry, -1, 1), lambda hz: 1 / (1 + (hz / 16000) ** 200))


dry = scene()
out = record(dry)
generate_wav(out)
```